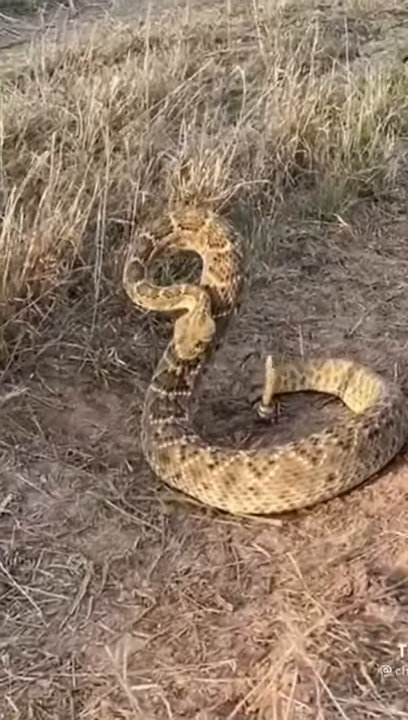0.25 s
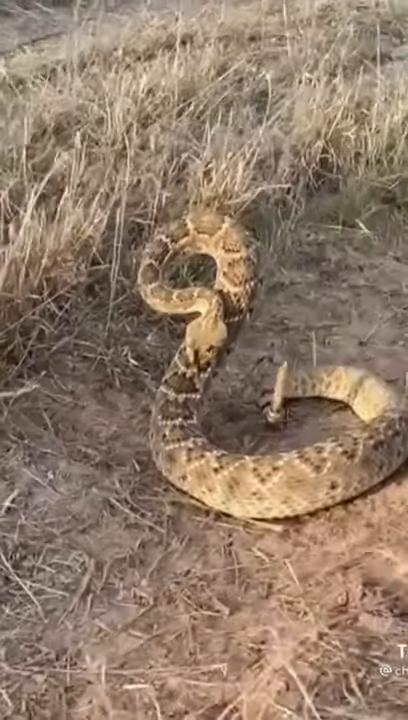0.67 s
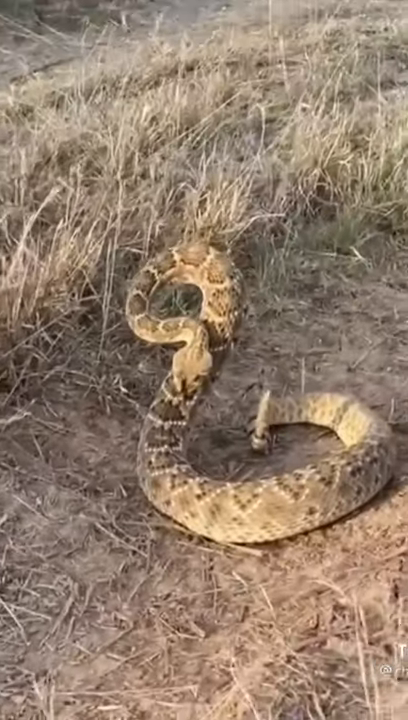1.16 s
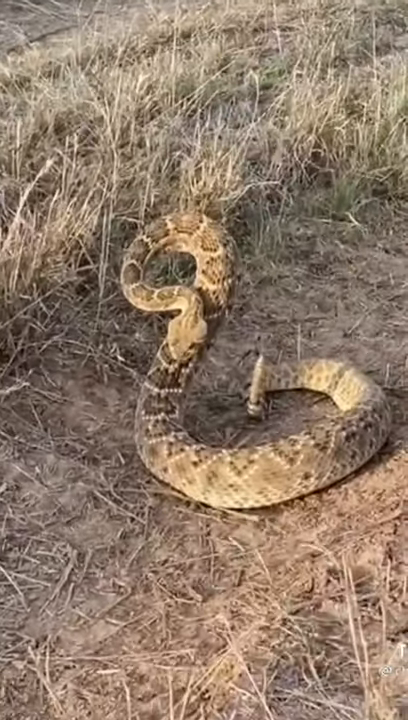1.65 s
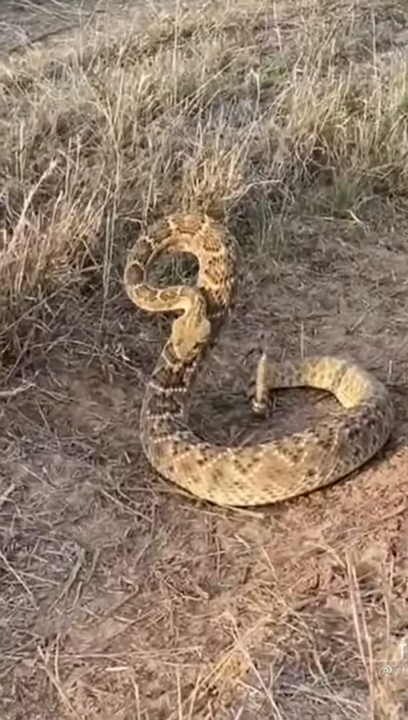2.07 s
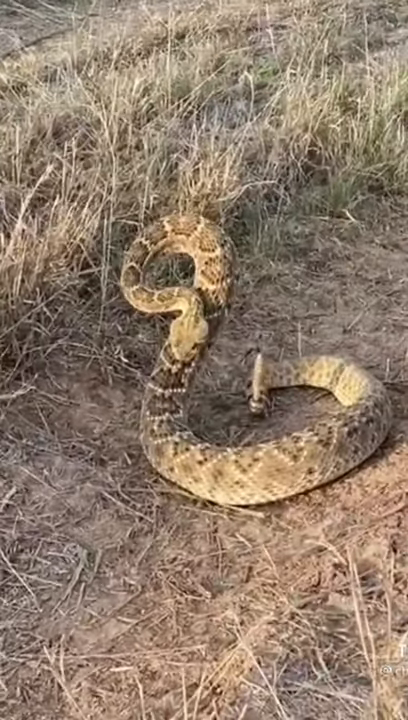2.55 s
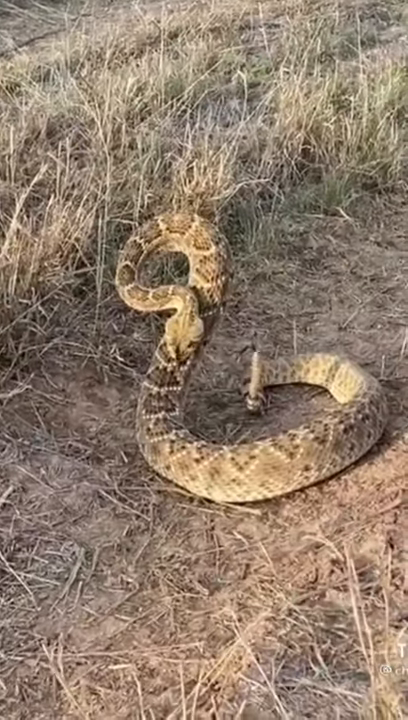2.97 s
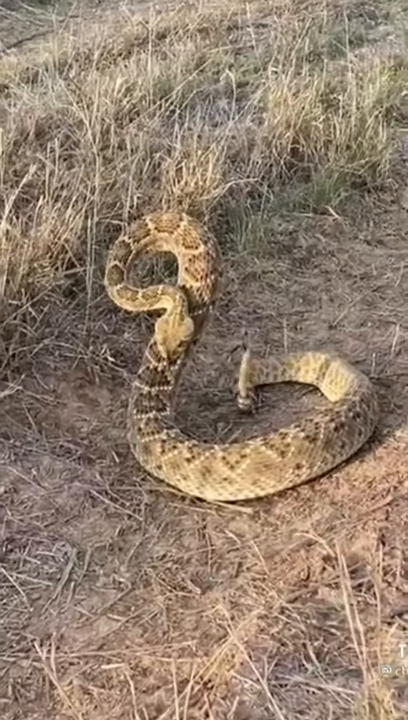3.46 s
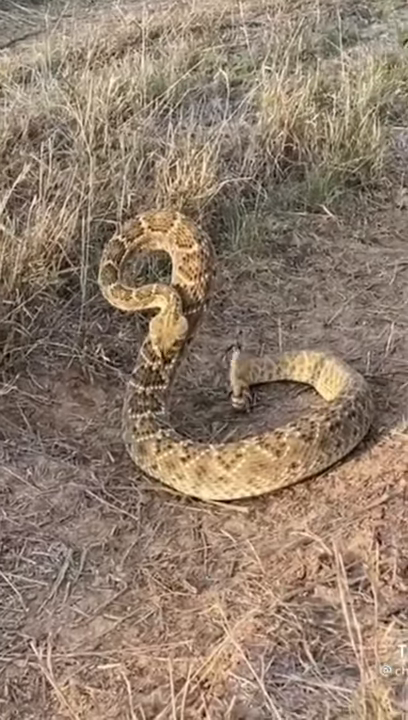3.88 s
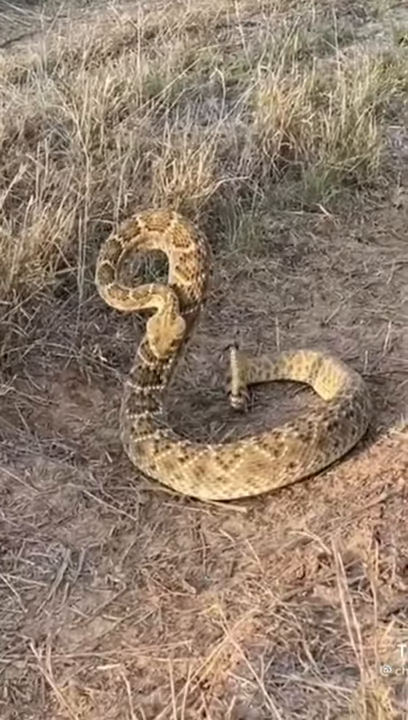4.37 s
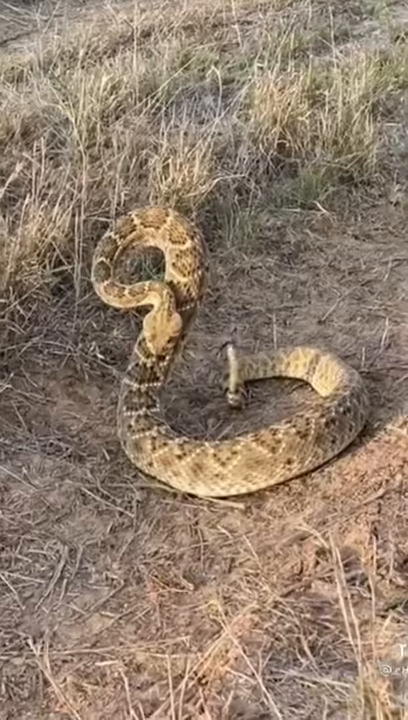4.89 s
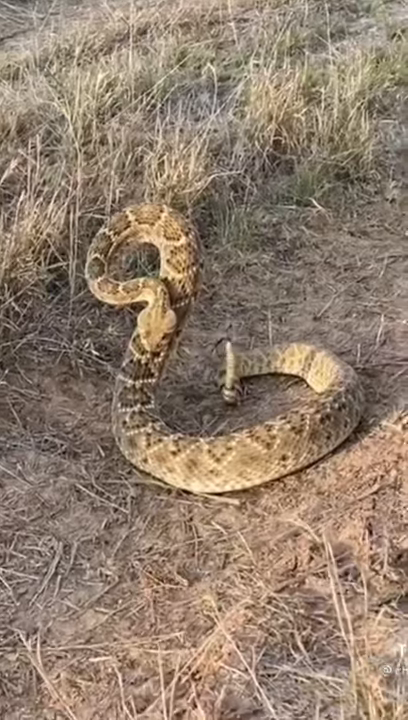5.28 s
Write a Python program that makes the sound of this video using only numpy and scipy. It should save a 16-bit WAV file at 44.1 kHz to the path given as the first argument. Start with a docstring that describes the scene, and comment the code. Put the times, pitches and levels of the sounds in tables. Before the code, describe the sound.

Close hand-held stereo pickup outdoors on dry ground: the snake's rattle is already at full buzz and stays almost steady, bright and grainy, weakening only slightly. Quiet scuffs come early, mostly just before half a second and clustered around 0.8 to 1 second, over a short rustle. Afterwards only the rattle remains, with faint distant rumble and air far below it.

```python
"""A coiled snake's rattle buzzes close to a hand-held phone: hollow keratin segments knock together,
most at both ends of each tail swing, as random bursts of short rings plus a near-even chain of ticks.
In the first second soft scuffs, gritty noise through resonances, sound over a rustle that fades soon after.
A low far rumble of lumpy noise with chance swells and a faint outdoor hush lie under the buzz."""
import sys
import numpy as np
from scipy import signal
from scipy.fft import rfft, irfft
from scipy.io import wavfile
from scipy.ndimage import uniform_filter1d

SR = 44100
rng = np.random.default_rng(int(sys.argv[2]) if len(sys.argv) > 2 else 0)


def wav_record(signal):
    """Record a signal, one row per channel, as 16-bit PCM in the file named by sys.argv[1]."""
    frames = np.transpose(np.atleast_2d(signal))
    bounded = np.clip(frames, -1, 1)
    # unit amplitude maps onto the largest positive 16-bit level
    quanta = np.round(bounded * 32767).astype(np.int16)
    wavfile.write(sys.argv[1], SR, quanta)


N = 244314
TIME_S = np.arange(N) / SR
LEFT_RIGHT = np.array([[.5], [-.5]])  # splits a left-right difference in dB
STFT = dict(nperseg=1024, noverlap=768)


def gain_of(db):
    """Decibels to amplitude."""
    return 10 ** (np.asarray(db) / 20)


def evened(x):
    """Scales to rms 1."""
    return x / np.sqrt(np.mean(x ** 2) + 1e-20)


def read(points, hz, order=1):
    """One column of a table, interpolated over log frequency."""
    table = np.transpose(points)
    return np.interp(np.log(hz + 1), np.log(table[0] + 1), table[order])


def curve(rows):
    """A table over time, interpolated at every sample."""
    return np.interp(TIME_S, *np.transpose(rows))


def bell(centre_s, width_s):
    """Gaussian envelope; width_s is its standard deviation."""
    return np.exp(-.5 * ((TIME_S - centre_s) / width_s) ** 2)


def smooth_noise(samples):
    """White noise under a moving average, rms 1."""
    return evened(uniform_filter1d(rng.standard_normal(N), samples))


def patches(shape, bins, frames):
    """Noise smoothed over frequency and time, rms 1."""
    over_hz = uniform_filter1d(rng.standard_normal(shape), bins, 0)
    return evened(uniform_filter1d(over_hz, frames, 1))


def to_sound(spectra):
    """Inverse short-time transform, cut to length."""
    return signal.istft(spectra, **STFT)[1][:, :N]


def noise_pair(spectrum):
    """Coloured noise on two channels, the right mixed from the left and independent noise."""
    # Left-right likeness of background noise. Each row: frequency in Hz, likeness 0-1.
    likeness = [(40, .985), (120, .97), (250, .85), (500, .6), (1000, .2), (1600, 1)]
    hz = np.fft.rfftfreq(N, 1 / SR)
    left, other = rfft(rng.standard_normal((2, N)))
    same = np.clip(read(likeness, hz), 0, 1)
    right = same * left + np.sqrt(1 - same ** 2) * other
    return evened(irfft(gain_of(read(spectrum, hz)) * np.array([left, right]), N))


def swing_phases():
    """Phases in radians of the tail swing and of the loose tip, which rocks at its own slower pace."""
    # Tail speed. Each row: time in seconds, swings per second.
    swing = [(0.0, 54.43), (0.4, 54.41), (0.79, 53.69), (1.19, 54.48), (1.58, 54.44), (2.2, 53.58),
             (2.77, 53.51), (3.17, 53.06), (4.75, 52.18), (5.54, 52.5)]
    # Drift of the tip's rocking ahead of its mean pace. Each row: time in seconds, lead in turns.
    sway_lead = [(0.0, .14), (.9, .04), (1.4, .25), (1.8, .58), (2.6, .55), (3.1, .95), (3.9, 1.03),
                 (4.6, 1.25), (5.54, 1.12)]
    start_turns, rocks_per_swing = .06, .475
    turn = 2 * np.pi * (np.cumsum(curve(swing)) / SR + start_turns)
    sway = rocks_per_swing * turn + 2 * np.pi * curve(sway_lead)
    return turn, sway


def crowding():
    """Knocks crowd at both ends of a swing, harder at one; the tip's rocking beats with the swing."""
    turn, sway = swing_phases()
    ends = .46 * np.cos(2 * turn) + .13 * np.cos(4 * turn + 2.5) + .11 * np.cos(turn - 2.4)
    beating = .2 * np.cos(sway) - .19 * np.cos(2 * turn - sway)
    return np.exp(ends + beating)


def shell_rings(crowd):
    """Random knocks each ring a few shell patches as short decaying sines."""
    # How strongly each shell patch follows the swing. Each row: frequency in Hz, exponent on crowding.
    pull = [(1500, 1.1), (3400, 1.75), (5200, .1), (6300, .1), (8000, .8), (12000, .5)]
    draws_per_s, excited_share = 26000, .11  # draws at crowding 1; only this share of them rings a patch
    force = gain_of(-0.5 * rng.uniform(-1.7, 1, N))
    draw = rng.random(N)  # shared by all patches
    ring_s = np.arange(300) / SR
    out = np.zeros(N)
    for hz in np.linspace(1200, 12000, 22):
        ring = np.exp(-ring_s * (hz + 3000) / 2.94) * np.sin(2 * np.pi * hz * ring_s)
        train = force * (draw < draws_per_s / SR * crowd ** read(pull, hz))
        patch = rng.uniform(-1, 1, N)
        push = np.sign(patch) * (abs(patch) < excited_share)
        out += signal.oaconvolve(train * push, ring / np.linalg.norm(ring))[:N]
    return evened(out)


def tick_chain(crowd):
    """Hard knocks run down the rattle in a near-even chain, faster where knocks crowd."""
    ticks_per_s, spread_db = 520, 2.2  # rate at crowding 1; spread per unit of an exponential draw
    chain = np.cumsum(ticks_per_s / SR * crowd ** 1.6 * rng.exponential(1, N) ** 2 / 2)
    ticks = (np.diff(np.floor(chain), prepend=0) > 0) * rng.choice([-1., 1.], N)
    return evened(ticks * gain_of(spread_db * np.minimum(rng.exponential(1, N), 3)))


def knocks():
    """Segment collisions: ringing shell patches plus hard ticks."""
    tick_db = -6  # against the rings
    crowd = crowding()
    return shell_rings(crowd) + gain_of(tick_db) * tick_chain(crowd)


def rattle():
    """Knocks reach two ports with a lag that turns with pitch; the right also hears other segments."""
    # Colour at one port. Each row: frequency in Hz, relative level in dB.
    colour = [(700, -48.5), (1300, -31), (1600, -21.5), (2100, -16), (2450, -16.5), (2850, 0.5),
              (3700, 2.5), (4200, 0.5), (4600, -4.5), (4900, -6), (5250, -5), (6100, -9), (7300, -7),
              (8400, -7.5), (9400, -12.5), (10400, -13), (11000, -14.5), (11500, -18), (11700, -26)]
    # Right port against left. Each row: frequency in Hz, lag in half turns, likeness 0-1 before easing.
    port_table = [(1200, .35, .3), (1650, 0, 1), (2050, 0, 1), (2400, .1, .8), (2600, .32, .8),
                  (2900, .28, .9), (3400, .02, .98), (3700, 0, .995), (4130, .02, .97), (4350, .16, .78),
                  (4560, .3, .5), (4730, .9, .8), (4810, 1, 1), (4990, 1, 1), (5150, 2, 1), (6350, 2, 1),
                  (7100, 2.2, .67), (8200, 2.55, .6), (9000, 2.76, .6), (9300, 2.86, .66),
                  (9800, 2.94, .83), (10350, 2.97, .92), (10700, 3, 1)]
    start_db, tiring_db_per_s = -35.95, -0.24  # the rattle weakens as the tail tires
    near = signal.stft(knocks(), **STFT)[2]
    other = signal.stft(knocks(), **STFT)[2]
    hz = np.fft.rfftfreq(1024, 1 / SR)[:, None]
    hz = hz * (1 + .011 * patches(near.shape, 9, 22))  # the hand drifts: the port notch wanders
    unlike = np.sqrt(1 - read(port_table, hz, order=2) ** 2)
    # the lag wanders where the ports disagree
    lag_rad = np.pi * read(port_table, hz) + 0.18 * unlike * patches(near.shape, 12, 14)
    apart = .9 * unlike  # easing
    right = np.exp(-1j * lag_rad) * (np.sqrt(1 - apart ** 2) * near + apart * other)
    # level varies at random over time and frequency, most in the treble
    vary_db = (0.5 + 2.034 * (hz / 8000) ** 2) * patches(near.shape, 5, 9)
    sound = to_sound(np.array([near, right]) * gain_of(read(colour, hz) + vary_db))
    return gain_of(start_db + tiring_db_per_s * TIME_S) * evened(sound)


def scuffs():
    """Resonant gritty noise under short bell-shaped strokes, over a fading patchy rustle."""
    # Soft scuffs. Each row: centre in seconds, level in dB before resonance weights,
    # bell width in seconds, centre in Hz, left-right difference in dB.
    strokes = [(0.236, -64, 0.0099, 480, -4), (0.416, -53.5, 0.024, 1400, 4.5),
               (0.419, -58, 0.0099, 480, 2), (0.453, -58, 0.018, 300, 1), (0.682, -55.5, 0.0033, 680, -3),
               (0.81, -59.5, 0.025, 480, 0), (0.848, -54, 0.01, 720, 5), (0.854, -49, 0.0041, 1500, 2),
               (0.869, -49.5, 0.018, 420, -2), (0.883, -60, 0.005, 250, -1), (0.891, -59, 0.0066, 700, .5),
               (0.916, -53.5, 0.01, 230, 5), (0.965, -57.5, 0.0076, 900, 3)]
    # Noise that excites the resonances. Each row: frequency in Hz, relative density in dB per Hz.
    grit_spectrum = [(59, -48), (140, 3), (337, -15.5), (412, -22.5), (725, -11), (1000, -14.5),
                     (1390, -9.5), (2000, -8.5), (2600, -20), (4400, -120)]
    # Scuff resonances. Each row: frequency in Hz, weight in dB.
    hollow = [(2090, 3), (1405, 2), (837, -14), (600, -3.5), (446, -0.5), (276, -2), (170, -6)]
    # Rustle near the microphone. Each row: time in seconds, level in dB before resonance weights.
    rustle_level = [(0.0, -72.5), (0.35, -63.5), (0.6, -72), (1.05, -69.5), (1.4, -83), (1.8, -110)]
    narrow_db = 14  # loss per squared octave from a scuff's centre
    grit = noise_pair(grit_spectrum)
    grit = grit * gain_of(0.85 * smooth_noise(150))
    rings = []
    for hz, _ in hollow:
        peak = signal.iirpeak(hz, 1.8, SR)
        once = signal.lfilter(*peak, grit)
        rings.append(evened(signal.lfilter(*peak, once)))  # twice: a steeper resonance
    rustle_db = curve(rustle_level) + 2.0 * smooth_noise(1500) + 2.7 * LEFT_RIGHT
    out = gain_of(rustle_db) * (0.94 * rings[2] + 0.5 * rings[3] + 0.76 * rings[4])
    for centre_s, db, width_s, centre_hz, pan_db in strokes:
        stroke = bell(centre_s, width_s) * gain_of(db + pan_db * LEFT_RIGHT)
        for (hz, ring_db), ring in zip(hollow, rings):
            weight_db = ring_db - narrow_db * np.log2(hz / centre_hz) ** 2
            out += stroke * gain_of(weight_db) * ring
    return out


def rumble():
    """Far low rumble: coloured noise with a lumpy, sagging level and chance swells."""
    # Rumble colour. Each row: frequency in Hz, relative density in dB per Hz.
    low_spectrum = [(12, -39), (20, -32), (40, -5), (65, 0.5), (98, -2.5), (135, -9), (160, -18),
                    (250, -31.5), (320, -58), (550, -120)]
    # Chance swells of the low noise. Each row: centre in seconds, peak in dB, frequency in Hz.
    swell_table = [(0.26, -45, 79.8), (0.86, -50, 90), (1.27, -48, 70.1), (1.43, -44, 68.5),
                   (1.71, -57, 62.5), (1.88, -48, 68.3), (2.2, -45, 62.6), (2.85, -45, 59.8),
                   (2.98, -44.5, 62), (3.21, -56, 60), (3.85, -47, 70.7), (3.989, -49, 67.4),
                   (4.95, -49, 71.2), (5.09, -51, 80)]
    start_db, sag_db_per_s, lumps_db, swell_width_s = -55, -0.45, -2, 0.015
    lumps = evened(uniform_filter1d(smooth_noise(3000), 3000))
    swells = np.zeros(N)
    for centre_s, db, hz in swell_table:
        wave = np.cos(2 * np.pi * (hz * TIME_S + rng.random()))
        swells += gain_of(db) * bell(centre_s, swell_width_s) * wave
    level_db = start_db + sag_db_per_s * TIME_S + lumps_db * lumps
    return gain_of(level_db) * noise_pair(low_spectrum) + swells


def air():
    """Faint outdoor hush: coloured noise whose level wanders over time and frequency, with lulls."""
    # Hush colour. Each row: frequency in Hz, relative density in dB per Hz.
    hush_spectrum = [(120, -23), (200, 1), (232, 1.5), (459, -11.5), (845, -5), (1140, -9.5), (1300, -10.5),
                     (1690, -35), (2860, -120)]
    level_db = -75.5
    spectra = signal.stft(noise_pair(hush_spectrum), **STFT)[2]
    shape = spectra.shape[1:]
    lulls_db = 4.1 * patches(shape, 2, 8) + 1.9 * patches(shape, 30, 5)
    return gain_of(level_db) * evened(to_sound(spectra * gain_of(lulls_db)))


def scene():
    """All sources at the two ports."""
    return rattle() + scuffs() + rumble() + air()


def record(dry):
    """The recorder's band limit: a steep linear-phase low-pass."""
    edge_hz = 11690
    low_pass = signal.firwin(1023, edge_hz, window=("kaiser", 10), fs=SR)
    return signal.oaconvolve(dry, low_pass[None], "same")


dry = scene()
out = record(dry)
wav_record(out)
```